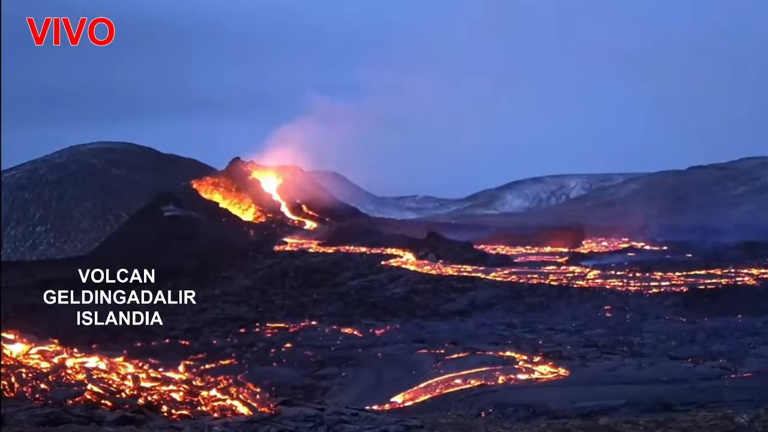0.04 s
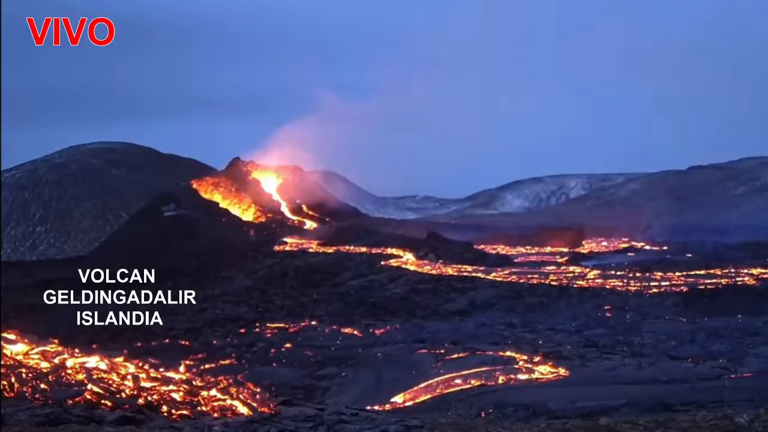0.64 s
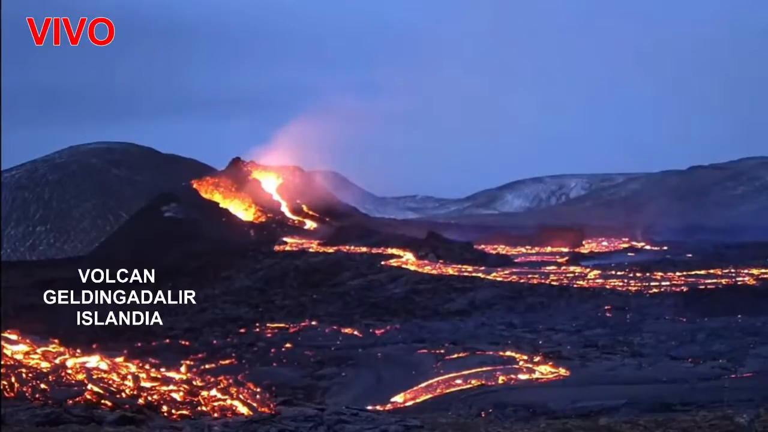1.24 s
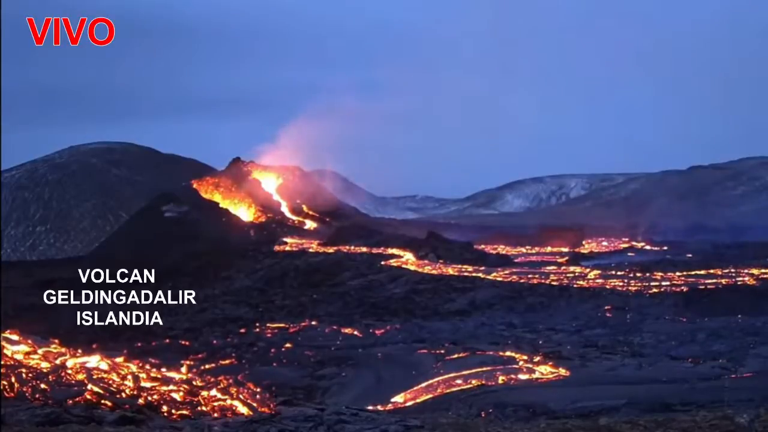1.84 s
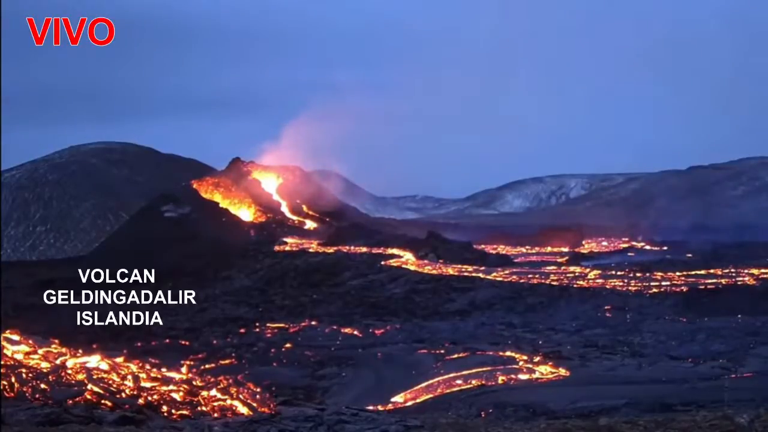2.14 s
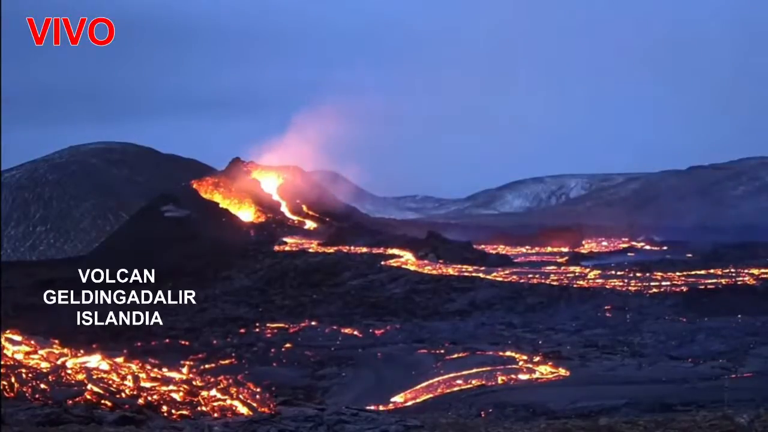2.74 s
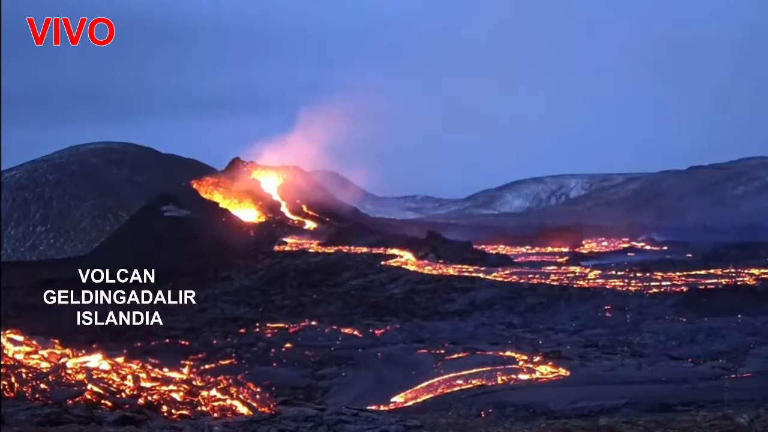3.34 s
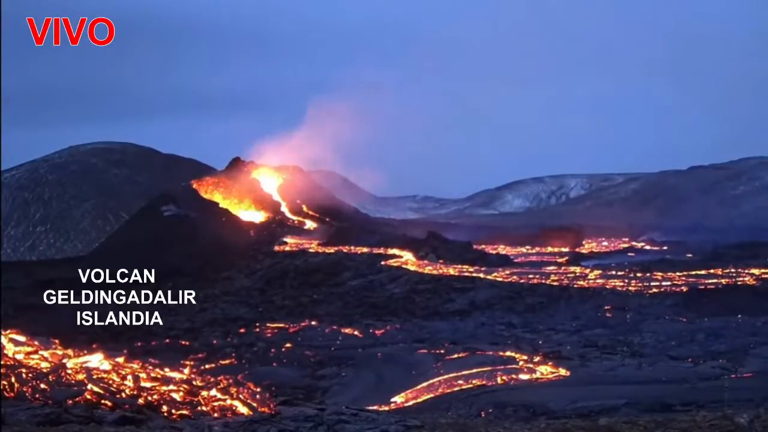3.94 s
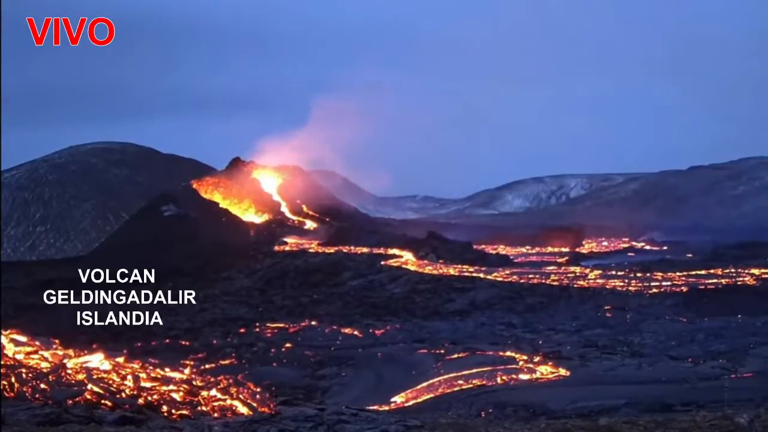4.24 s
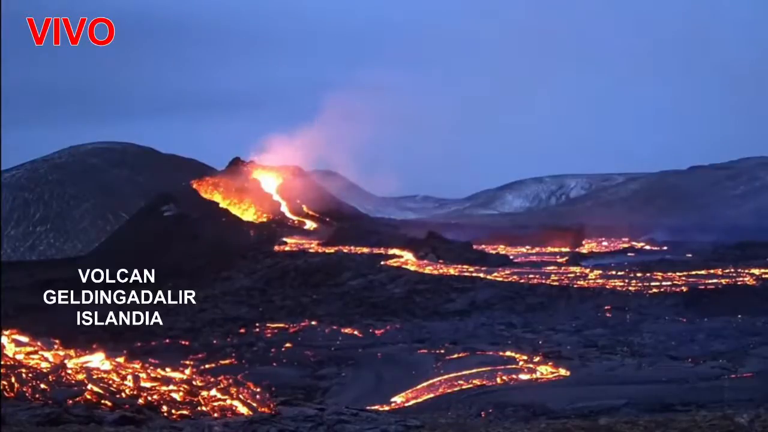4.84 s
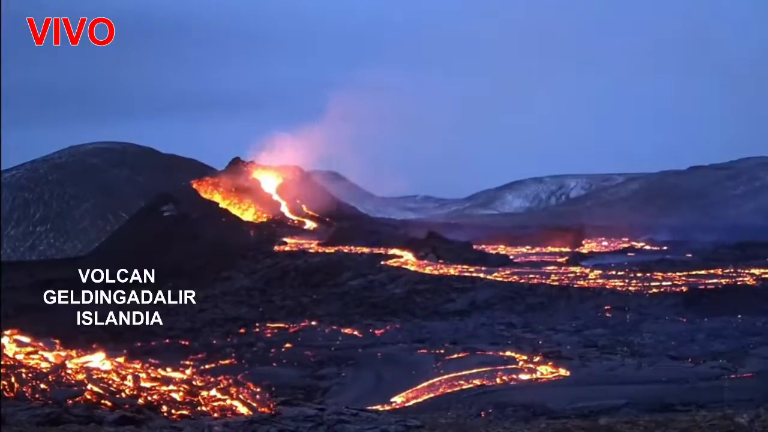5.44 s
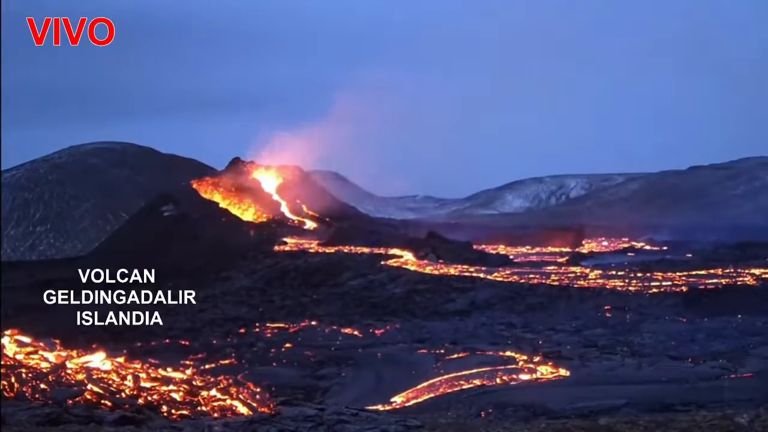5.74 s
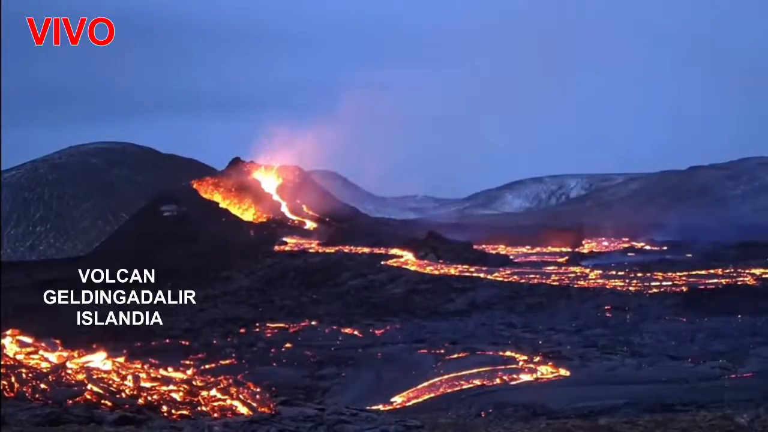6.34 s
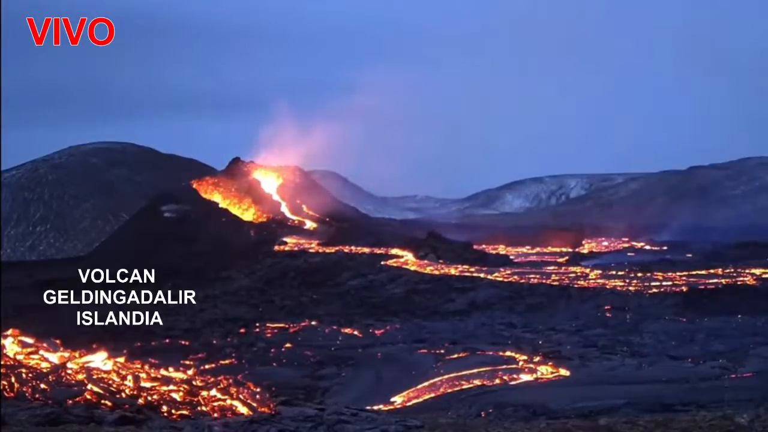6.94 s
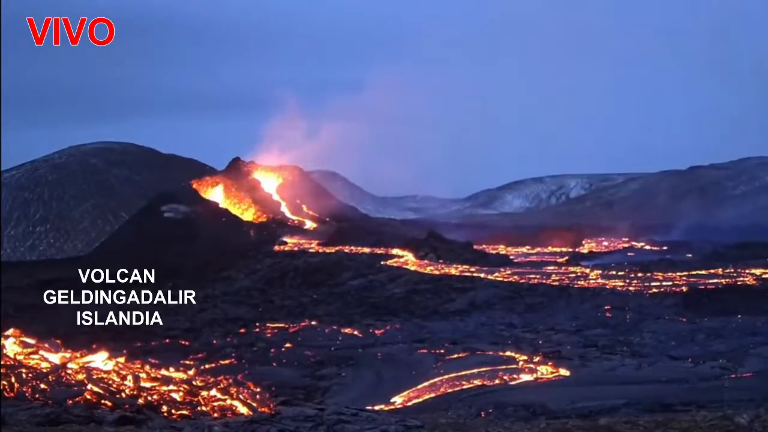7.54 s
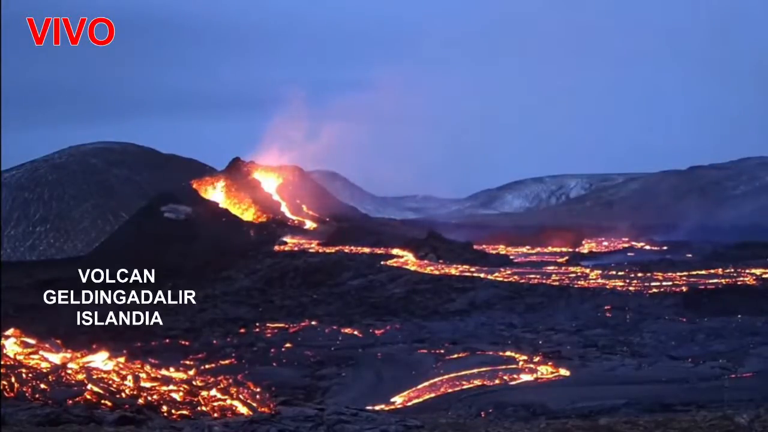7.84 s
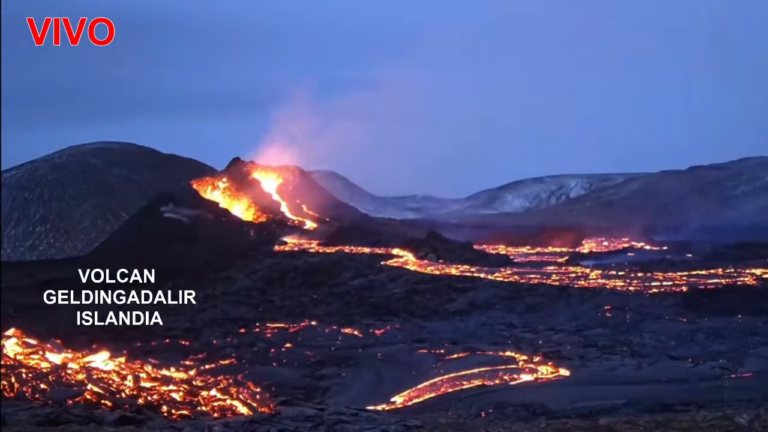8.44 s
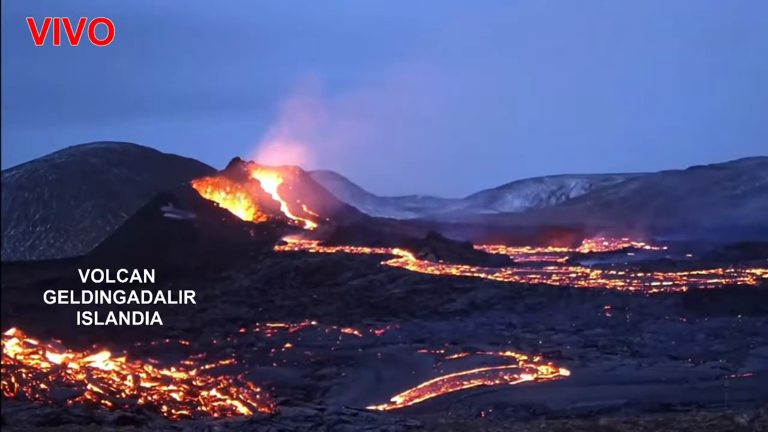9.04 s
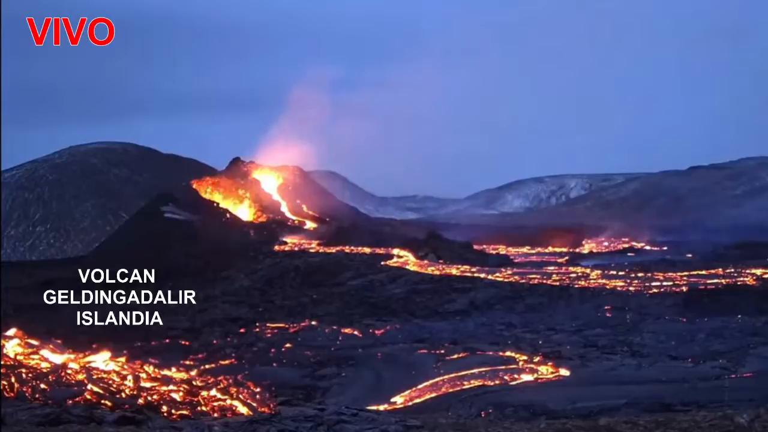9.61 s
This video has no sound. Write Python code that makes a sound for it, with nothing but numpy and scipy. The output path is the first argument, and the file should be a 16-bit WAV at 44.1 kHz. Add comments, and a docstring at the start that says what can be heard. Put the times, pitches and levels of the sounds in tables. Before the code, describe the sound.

A lava fountain roars in a volcanic crater, heard from far across open ground. A very low rumble and hollow booming run under surging puffs of rushing gas. Big bubbles burst with round thumps, while spray hisses and falling lumps of lava give small, dry cracks. A faint fizz rides on the roar. Near the end the eruption eases and the thumps thin out.

```python
"""A lava fountain roars in the crater of a volcano, heard from far across open ground.
Gas surges through the melted rock: the pool rumbles, the crater booms and the gas jet rushes.
Spray hisses, big bubbles burst with a thump, and lumps of lava crack. The eruption eases near the end.
The recorder holds down the loudest peaks, and its uneven timing adds a fizz."""
import sys
import numpy as np
from scipy import signal
from scipy.fft import rfft, irfft
from scipy.io import wavfile
from scipy.ndimage import uniform_filter1d, minimum_filter1d

SR = 44100
rng = np.random.default_rng(int(sys.argv[2]) if len(sys.argv) > 2 else 0)


def generate_wav(signal):
    """Clip the signal to [-1, 1] and save it as 16-bit WAV at the path in sys.argv[1]."""
    frames = np.transpose(np.atleast_2d(signal))
    scaled = np.clip(frames, -1, 1) * 32767
    pcm = np.round(scaled).astype(np.int16)
    wavfile.write(sys.argv[1], SR, pcm)


N = 426447
TIME = np.arange(N) / SR


def gain_of(db):
    """Turns decibels into a number to multiply a sound by."""
    return 10 ** (np.asarray(db) / 20)


def evened(x):
    """Scales a signal to an average power of 1."""
    return x / np.sqrt(np.mean(x ** 2) + 1e-20)


def follow(rows):
    """Joins a table's (time_s, value) points with straight lines."""
    return np.interp(TIME, *np.transpose(rows))


def add(mix, start_s, sound):
    """Mixes a sound in at the given time."""
    part = mix[round(start_s * SR):][:len(sound)]
    part += sound[:len(part)]


def flutter(rate_hz):
    """A smooth random wiggle that moves up to about the given rate."""
    hz = np.fft.rfftfreq(N, 1 / SR)
    return evened(irfft(rfft(rng.standard_normal(N)) / (1 + (hz / rate_hz) ** 4), N))


def swells(rows, rise_s, fall_s):
    """Short lifts in dB: each grows up to its peak time, then dies away."""
    total_db = np.zeros(N)
    for peak_s, lift_db in rows:
        age = TIME - peak_s
        total_db += lift_db * np.exp(-(age / np.where(age < 0, rise_s, fall_s)) ** 2)
    return total_db


def turbulence(tone, patchy_db, size=4096):
    """Noise shaped by a tone table; swirls make patches of it louder and softer."""
    hz = np.fft.rfftfreq(size, 1 / SR)
    real, imag, patches = rng.standard_normal((3, 4 * N // size + 5, len(hz)))
    patches = uniform_filter1d(patches, size=6, axis=0)  # smooth over time
    patches = evened(uniform_filter1d(patches, size=9, axis=1))  # and over pitch
    pitch_hz, level_db = np.transpose(tone)
    tone_db = np.interp(np.log(hz + 1), np.log(pitch_hz), level_db)
    spectrum = (real + 1j * imag) * gain_of(tone_db + patchy_db * patches)
    _, noise = signal.istft(spectrum.T, nperseg=size, noverlap=size - size // 4)
    return evened(noise[:N])


def steadied(noise, span_s):
    """Takes the slow swells out of a noise and leaves its fast grain."""
    window = np.hanning(int(span_s * SR))
    power = signal.fftconvolve(noise ** 2, window, "same")
    power /= signal.fftconvolve(np.ones(N), window, "same")
    return noise / np.sqrt(power)


# The tone of the pool's rumble: pitch_hz, level_db
POOL_TONE = [(10, -24), (24, -12.5), (38, -4.5), (50, -0.5), (66, -9.5), (86, -15.5), (130, -33.5),
             (300, -77.5)]
# How hard the pool churns: time_s, level_db
POOL_CHURN = [(0, -24), (1.2, -28), (2.3, -30.5), (3.0, -20.5), (4.1, -24.5), (5.3, -32), (6.05, -27.5),
              (7.0, -31.5), (7.9, -34), (9.15, -34.5), (9.67, -32)]
# Big heaves of the pool: peak_s, lift_db
POOL_HEAVES = [(0.12, 2), (0.4, -2), (0.58, 3), (1.22, 4), (1.48, 4), (1.94, 14), (2.07, 6), (2.43, 8),
               (2.63, 4), (3.15, 2), (3.4, -1), (4.87, 6), (8.32, 7), (9.6, 5)]


def pool_rumble():
    """The lava pool churns and heaves with a very low rumble."""
    heaves_db = swells(POOL_HEAVES, rise_s=0.032, fall_s=0.033)
    level_db = follow(POOL_CHURN) + heaves_db + 0.94 * flutter(rate_hz=10) - 1.2
    return gain_of(level_db) * steadied(turbulence(POOL_TONE, patchy_db=5.5), span_s=0.27)


# The tone of the pipe's drone: pitch_hz, level_db
PIPE_TONE = [(40, -26), (58, -4.5), (72, -2), (86, -11), (105, -2), (133, 1.5), (160, -3.5), (200, -14),
             (400, -73.5)]
# How loud the drone is: time_s, level_db
PIPE_LEVEL = [(0, -30), (1.3, -24), (1.8, -27.5), (2.3, -26.5), (2.65, -24.5), (3.2, -18), (4.0, -22),
              (4.45, -23), (5.1, -29), (5.85, -24), (6.25, -27.5), (6.75, -26.5), (7.5, -32.5),
              (7.95, -36.5), (9.1, -39), (9.67, -39.5)]


def pipe_drone():
    """The rock pipe that feeds the crater gives a deep drone."""
    level_db = follow(PIPE_LEVEL) + flutter(rate_hz=9.8)
    return gain_of(level_db) * steadied(turbulence(PIPE_TONE, patchy_db=0.4), span_s=0.92)


# The tone of the crater's boom: pitch_hz, level_db
BOOM_TONE = [(90, -39.5), (135, -15.5), (165, -5.5), (195, -1.5), (228, -0.5), (270, -3.5), (310, -12),
             (420, -22), (900, -72)]
# How the boom's pitch drifts: time_s, shift_semitones
BOOM_DRIFT = [(0, .7), (2.0, .8), (2.75, -.2), (3.9, .3), (4.55, -0.898), (5.5, -.3), (7.0, -.7), (8.1, .3),
              (9.67, 0)]


def crater_boom(gas_db, weight_db):
    """The gas makes the crater boom; the pitch drifts as its hollow changes."""
    level_db = -19.5 + 0.98 * gas_db + weight_db + 1.2 * flutter(rate_hz=5.3)
    noise = turbulence(BOOM_TONE, patchy_db=2)
    speed = 2 ** (follow(BOOM_DRIFT) / 12)  # played faster, the noise sounds higher
    drifting = np.interp(np.cumsum(speed / speed.mean()), np.arange(N), noise)
    return gain_of(level_db) * steadied(drifting, span_s=0.21)


# The tone of the rushing gas: pitch_hz, level_db
JET_TONE = [(250, -38.5), (380, -9.5), (455, -3), (545, -1.5), (590, -1), (660, -7), (765, -7.5),
            (850, -15), (1200, -33), (3000, -70)]


def gas_jet(gas_db, puffs_db):
    """Gas rushes out of the vent in puffs."""
    level_db = -23.5 + 0.86 * gas_db + puffs_db + 1.04 * flutter(rate_hz=9.9)
    return gain_of(level_db) * steadied(turbulence(JET_TONE, patchy_db=1.06), span_s=0.24)


# The tone of the vent's throat: pitch_hz, level_db
THROAT_TONE = [(150, -34), (260, -13.5), (320, -3.5), (362, 2), (400, -1), (450, -12), (560, -33),
               (900, -67.5)]
# How strongly the throat rings: time_s, lift_db
THROAT_RING = [(0, -1), (1.2, -1), (1.75, -0.5), (2.3, -2), (2.62, 2), (2.9, 5), (3.06, -3), (3.22, 5),
               (3.9, -3.5), (4.27, 1.5), (5.2, -0.5), (5.8, -2), (6.3, -1), (6.5, -6.5), (6.68, 0),
               (7.0, -3.5), (7.6, 0), (8.1, -5.5), (8.6, -1.5), (9.67, -2)]


def throat_note(gas_db, puffs_db):
    """The vent's throat rings with a hollow note as gas is forced through."""
    level_db = -24 + 0.7 * gas_db + 0.8 * puffs_db + follow(THROAT_RING) + 0.65 * flutter(rate_hz=7.9)
    return gain_of(level_db) * steadied(turbulence(THROAT_TONE, patchy_db=2.5), span_s=0.29)


# The tone of the spray's hiss: pitch_hz, level_db
SPRAY_TONE = [(400, -20.5), (750, -0.5), (900, -1.5), (1060, 2), (1250, -3.5), (1550, -4.5), (2000, -10.5),
              (2500, -17.5), (3200, -28.5), (4500, -40.5), (8000, -53.5)]


def spray(fountain_db):
    """Torn lava hisses above the vent, flickering as the gas throws it out."""
    level_db = fountain_db + 0.42 + 0.5 * flutter(rate_hz=80)
    return gain_of(level_db) * turbulence(SPRAY_TONE, patchy_db=1.5, size=2048)


def snap(pitch_hz, cycles):
    """One tiny crack: a few waves that swell and die within milliseconds."""
    turns = (np.arange(SR // 50) / SR - 0.002) * pitch_hz
    return np.exp(-(turns / cycles) ** 2) * np.sin(2 * np.pi * turns)


def spatter(fountain_db, lumps_per_s=640, spread_db=4.5, dull_db_per_octave=6, pitches=24):
    """Falling lumps of lava make countless small cracks; the air dulls the higher ones."""
    out = np.zeros(N)
    for pitch_hz in np.geomspace(1100, 3200, pitches):
        lands = rng.random(N) < lumps_per_s / pitches / SR
        size = np.minimum(rng.exponential(1, N), 3.5)
        clicks = lands * gain_of(spread_db * size - dull_db_per_octave * np.log2(pitch_hz / 1000))
        out += signal.oaconvolve(clicks, snap(pitch_hz, cycles=0.75))[:N]
    # Lumps keep landing while the gas eases, so they follow the surges only in part.
    return gain_of(0.86 * fountain_db - 17) * evened(out)


def sizzle():
    """A faint, steady hiss lies under everything, brightest around 3 kHz."""
    # pitch_hz, level_db
    tone = [(1200, -21), (2400, 7), (3200, 8), (4200, -8), (6000, -18), (8000, -31)]
    hiss = turbulence(tone, patchy_db=-1, size=256)
    return gain_of(-59 + 1.5 * flutter(rate_hz=150)) * hiss


# Big gas bubbles bursting: peak_s, pitch_hz, level_db
BUBBLES = [(0.56, 205, -13.5), (0.86, 190.5, -16), (1.01, 196, -16), (1.13, 230.7, -13),
           (1.419, 216.3, -14), (1.67, 205.7, -15), (1.77, 219, -12), (1.96, 247.8, -17),
           (2.14, 224, -21.5), (2.59, 228.8, -11), (2.65, 189.6, -17), (2.74, 198.4, -14.5),
           (2.85, 342, -24), (2.96, 373, -22), (3.29, 223, -14.5), (3.34, 182.8, -13.5),
           (3.76, 197.6, -15.5), (3.84, 230.7, -17), (4.11, 189.3, -17), (4.19, 230, -18.5),
           (4.29, 358, -23), (4.39, 222.3, -14.5), (4.49, 165.3, -22), (5.16, 254.6, -24.5),
           (5.71, 229, -16), (5.849, 173.5, -15.5), (5.95, 191.6, -20), (6.16, 214, -20.5),
           (6.27, 253.6, -17), (6.56, 229, -16), (6.62, 366, -21), (6.68, 256, -21), (6.84, 254.5, -17),
           (7.552, 222, -23), (8.17, 239, -28), (9.489, 190.7, -28)]


def bubble_thumps(rise_s=0.029, fall_s=0.027, sag_per_s=1.093, waver=0.048, lift_db=0.2):
    """Each big bubble bursts and rings its own hollow: a round, shaky thump whose pitch sags."""
    out = np.zeros(N)
    age = np.arange(-SR // 10, SR // 6) / SR  # zero at the thump's peak
    for peak_s, pitch_hz, level_db in BUBBLES:
        shake = evened(uniform_filter1d(rng.standard_normal(len(age)), size=300))
        sagging_hz = pitch_hz * (1 - sag_per_s * age + waver * shake)
        turns = np.cumsum(sagging_hz) / SR + rng.random()
        note = np.sqrt(2) * np.sin(2 * np.pi * turns)
        swell = np.exp(-(age / np.where(age < 0, rise_s, fall_s)) ** 2)
        add(out, peak_s + age[0], gain_of(level_db + lift_db) * swell * note)
    return out


# Sharp cracks that stand out from the roar: start_s, pitch_hz, ring_db, shards_db, shards_fade_s
LAVA_CRACKS = [(0.655, 3400, -33, -30, .004), (0.867, 3300, -32, -28, .001), (2.266, 1700, -24, -33, .002),
               (2.374, 1900, -30, -38, .001), (3.272, 1600, -23, -32, .002), (4.714, 3300, -38, -30, .009),
               (4.718, 1400, -24, -33, .002), (4.829, 3000, -36, -34, .002), (5.582, 2760, -31, -32, .003),
               (5.825, 2800, -42, -31, .008), (7.566, 2100, -28, -31, .001), (8.093, 2900, -36, -37, .002),
               (8.63, 3010, -39, -38, .002), (8.786, 2300, -28.5, -32, .003),
               (9.081, 1400, -24.5, -37, .003), (9.1, 1500, -34, -38, .003), (9.132, 2500, -40, -36, .003),
               (9.33, 1810, -31, -38, .003), (9.599, 2410, -38, -37, .003)]


def lava_cracks(rise_s=0.002):
    """Lava bursts with a short ring and a dry, mostly lower spray of shards."""
    out = np.zeros(N)
    age = np.arange(SR // 50) / SR
    for start_s, pitch_hz, ring_db, shards_db, fade_s in LAVA_CRACKS:
        band = signal.butter(4, [0.4 * pitch_hz, 1.05 * pitch_hz], "bandpass", fs=SR, output="sos")
        shards = evened(signal.sosfilt(band, rng.standard_normal(len(age)))) / 2
        shards *= np.minimum(age / rise_s, 1) ** 3 * np.exp(-np.maximum(age - rise_s, 0) / fade_s)
        ring = snap(pitch_hz, cycles=2)
        add(out, start_s, gain_of(ring_db) * ring + gain_of(shards_db) * shards)
    return out


# How hard the gas pushes through the vent: time_s, level_db
GAS_PUSH = [(0, 1), (0.8, -1), (1.08, 2.5), (1.55, -2), (1.8, 0), (2.4, -4.5), (2.8, 0.5), (3.3, 0.5),
            (3.72, -2), (4.35, 0.9), (4.8, -2), (5.3, -5.5), (5.78, 1.5), (6.12, -1), (6.35, 2.5),
            (6.49, 2.2), (6.63, 4), (6.78, 2.7), (7.1, -2.5), (7.66, -5), (7.88, -8), (8.55, -4.5),
            (8.95, -11), (9.28, -15), (9.67, -10)]
# Extra weight of the crater's boom against the jet: time_s, lift_db
BOOM_WEIGHT = [(0, 1.5), (0.85, 2), (1.15, 4), (1.35, 2), (1.75, 6), (2.03, 0), (2.42, 3), (2.66, 7.5),
               (2.95, 2), (3.55, 3), (3.76, 5), (4.5, 0), (5.3, 2.5), (6.4, -3), (7.3, 0), (7.75, -1.5),
               (8.5, -3), (9.05, 1.5), (9.67, -0.5)]
# Sudden puffs of gas: peak_s, lift_db
GAS_PUFFS = [(.91, -0.5), (2.15, 2.5), (2.85, 3), (2.96, 2), (3.21, 4), (3.29, 0.5), (3.92, 6), (4.31, 4),
             (5.73, 4), (6.3, 2), (6.39, 0), (6.615, 5.3), (6.68, 3), (7.73, 2.5), (9.46, 2.5)]
# Tall throws of the fountain, which lift the spray and spatter: peak_s, lift_db
TALL_THROWS = [(1.13, -0.5), (2.8, 1), (3.25, 1.5), (4.42, 1.3), (5.86, 0.7), (6.34, 1.5), (6.53, 1),
               (7.42, 0.5), (7.58, 1.5), (8.74, 1)]


def scene():
    """All the far-off sounds reach one microphone; the push of the gas drives the fountain."""
    gas_db, weight_db = follow(GAS_PUSH), follow(BOOM_WEIGHT)
    puffs_db = swells(GAS_PUFFS, rise_s=0.033, fall_s=0.032)
    throws_db = swells(TALL_THROWS, rise_s=0.054, fall_s=0.096)
    fountain_db = -31.5 + 0.86 * gas_db + 0.093 * puffs_db + throws_db
    fountain_db -= 0.15 * weight_db  # the spray grows a little when the boom gives way
    mix = pool_rumble() + pipe_drone() + crater_boom(gas_db, weight_db)
    mix += gas_jet(gas_db, puffs_db) + throat_note(gas_db, puffs_db)
    mix += spray(fountain_db) + spatter(fountain_db) + sizzle()
    mix += bubble_thumps() + lava_cracks()
    return mix[None]


# Regular wobbles in the recorder's timing (0 dB is one sample's length): rate_hz, depth_db
TIME_WOBBLES = [(1950, -10), (3900, -11.5), (4500, -20), (5250, -26.5), (5850, -15), (6450, -20.5),
                (7800, -20)]
# The treble falls away above about 8 kHz: pitch_hz, level_db
TREBLE_LOSS = [(7600, 0), (8000, -12.5), (8400, -12), (9600, -21)]


def record(dry, ceiling_db=-4, jitter_db=-22, highest_hz=9600):
    """The recorder holds down peaks and its uneven timing fizzes. Treble above about 8 kHz falls away."""
    allowed_gain = (1 + (abs(dry[0]) / gain_of(ceiling_db)) ** 8) ** (-1 / 8)
    limited = dry[0] * uniform_filter1d(minimum_filter1d(allowed_gain, size=120), size=120)
    wobble = sum(gain_of(db) * np.sin(2 * np.pi * (hz * TIME + rng.random())) for hz, db in TIME_WOBBLES)
    jitter = gain_of(jitter_db) * rng.standard_normal(N)
    # A sample taken early or late is most wrong where the wave is steep, so the fizz rides on the roar.
    fizzy = limited + np.gradient(limited) * (wobble + jitter)
    treble_db = np.interp(np.fft.rfftfreq(N, 1 / SR), *np.transpose(TREBLE_LOSS))
    dulled = irfft(rfft(fizzy) * gain_of(treble_db), N)
    treble_cut = signal.firwin(301, highest_hz, window=("kaiser", 8), fs=SR)
    return signal.oaconvolve(dulled, treble_cut, "same")[None]


dry = scene()
out = record(dry)
generate_wav(out)
```